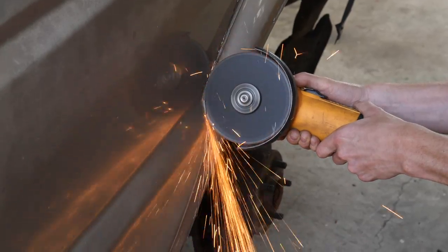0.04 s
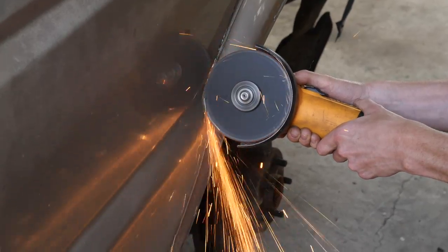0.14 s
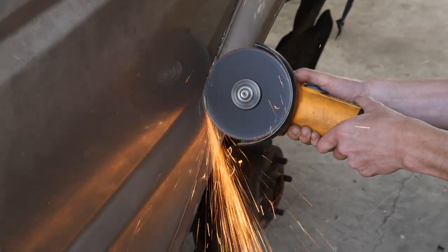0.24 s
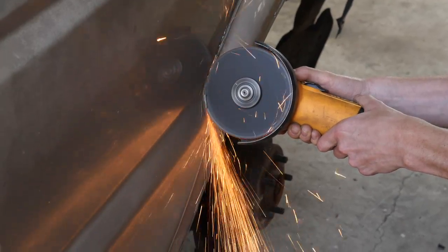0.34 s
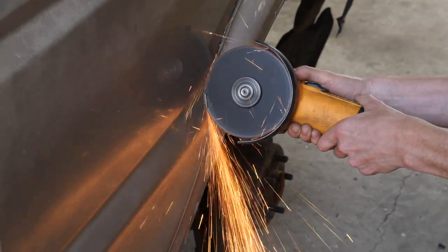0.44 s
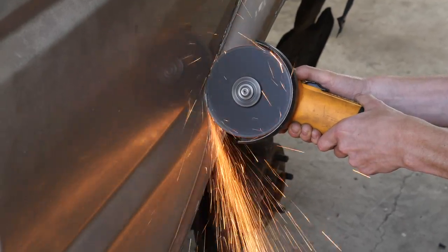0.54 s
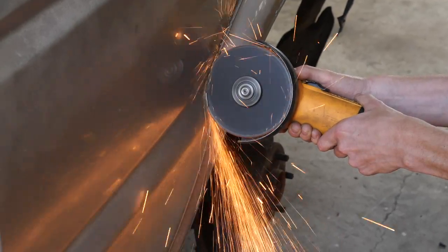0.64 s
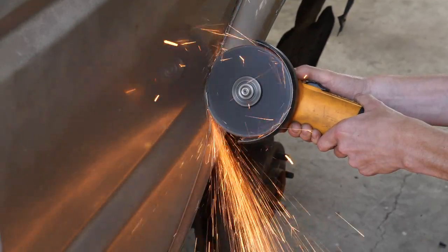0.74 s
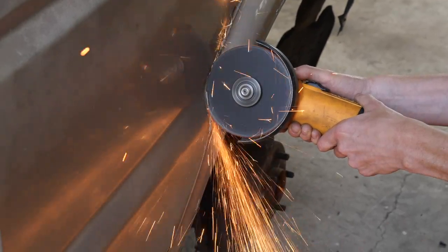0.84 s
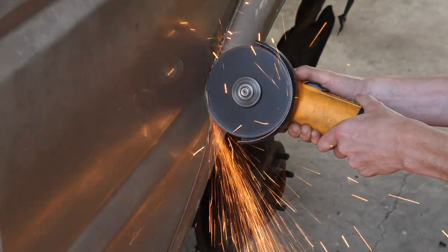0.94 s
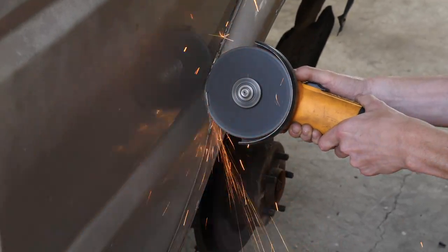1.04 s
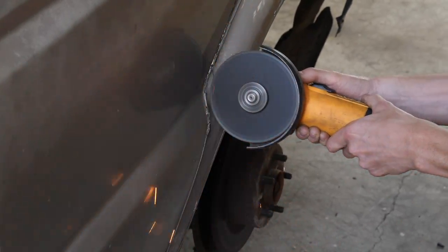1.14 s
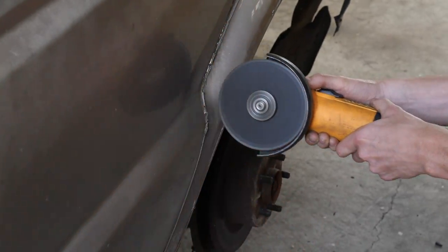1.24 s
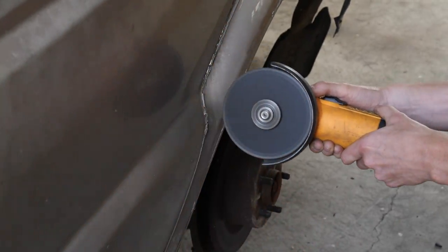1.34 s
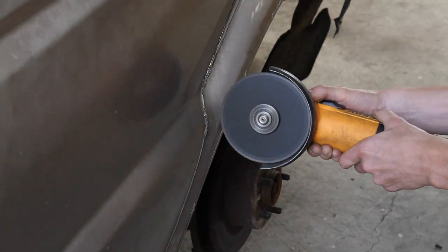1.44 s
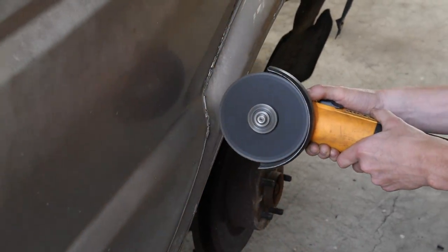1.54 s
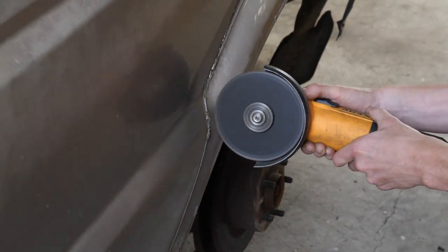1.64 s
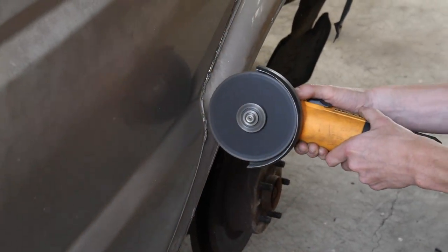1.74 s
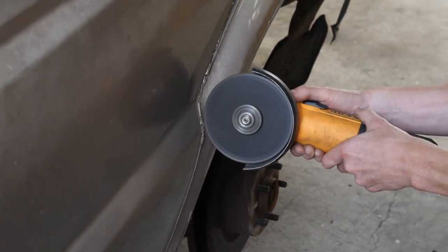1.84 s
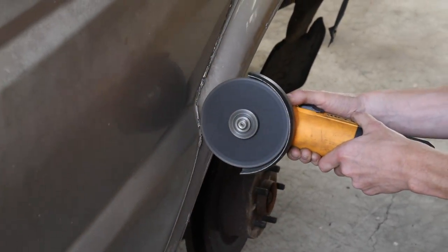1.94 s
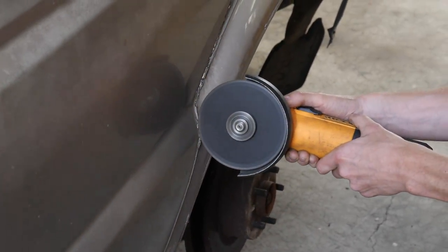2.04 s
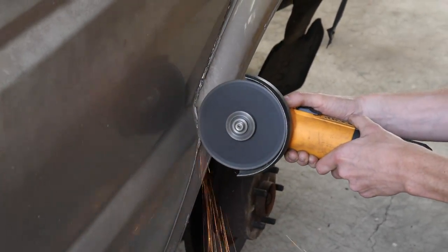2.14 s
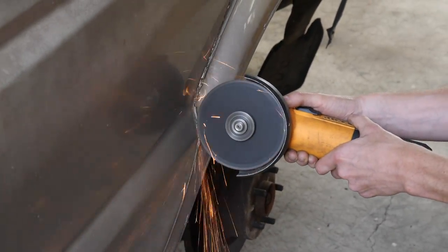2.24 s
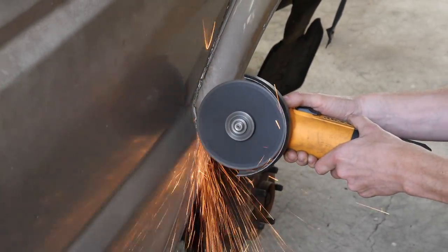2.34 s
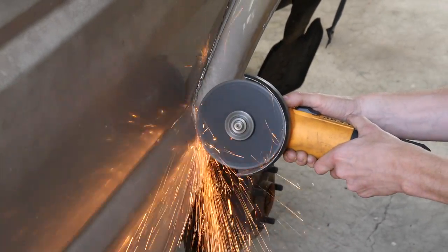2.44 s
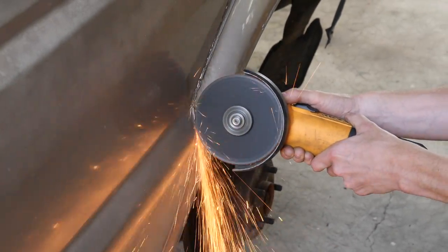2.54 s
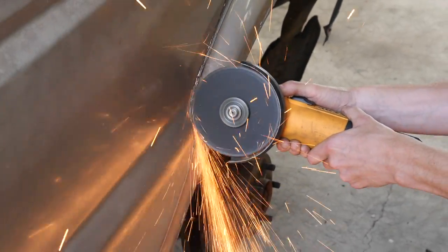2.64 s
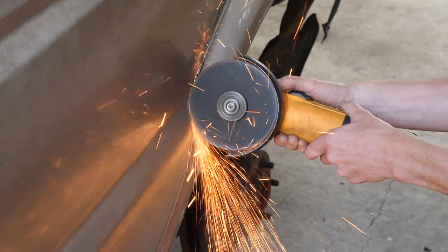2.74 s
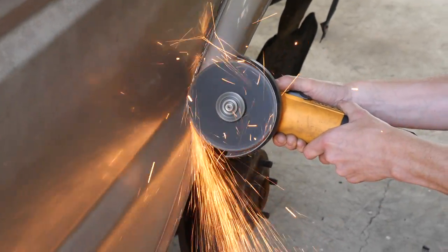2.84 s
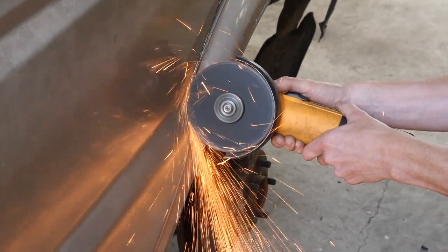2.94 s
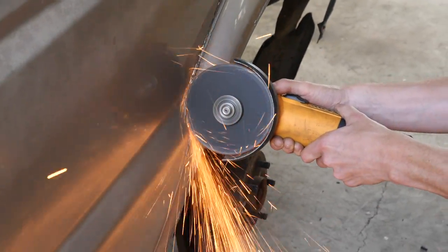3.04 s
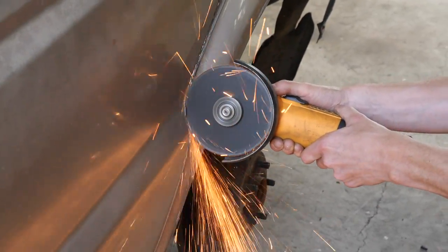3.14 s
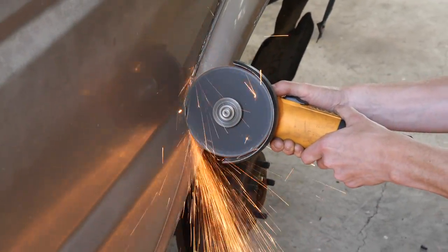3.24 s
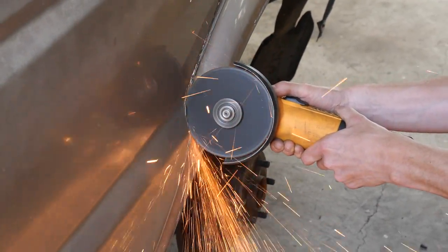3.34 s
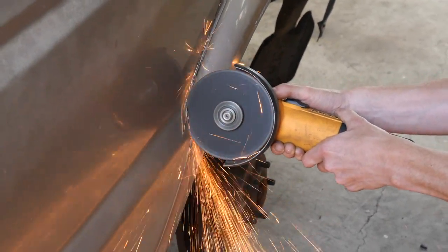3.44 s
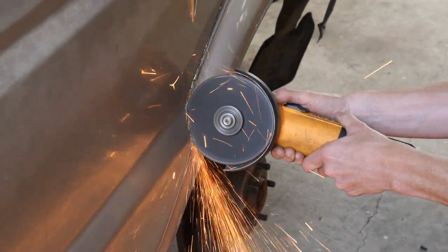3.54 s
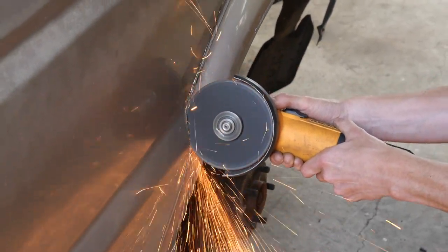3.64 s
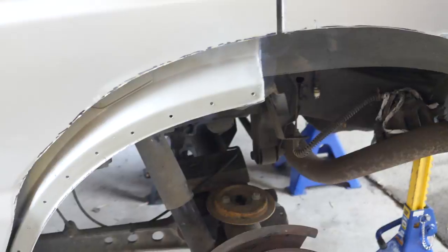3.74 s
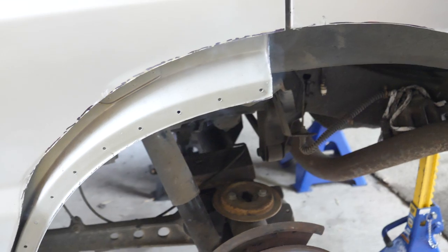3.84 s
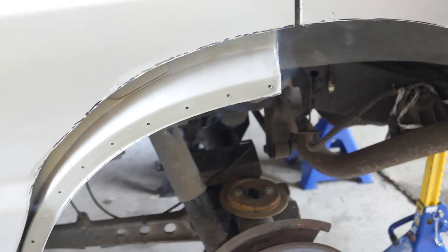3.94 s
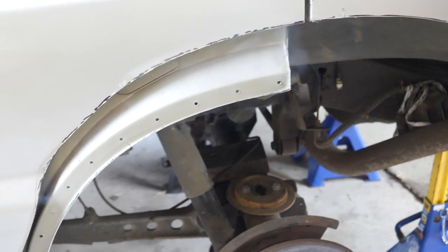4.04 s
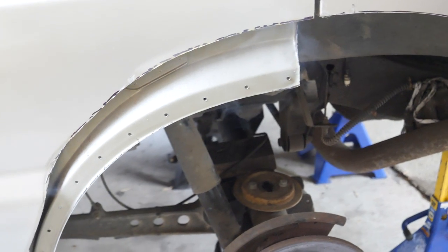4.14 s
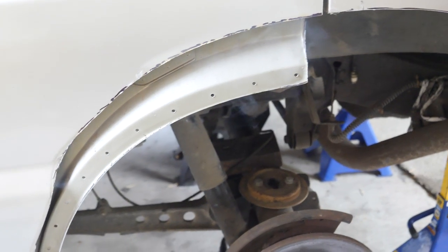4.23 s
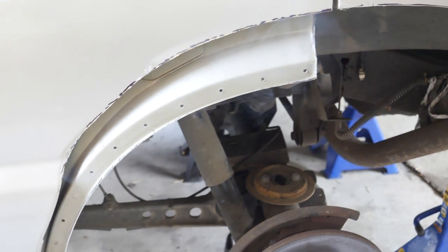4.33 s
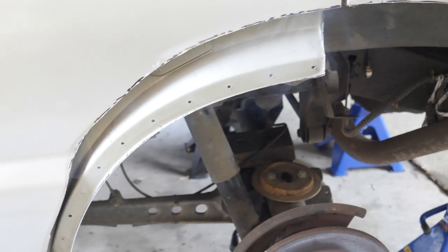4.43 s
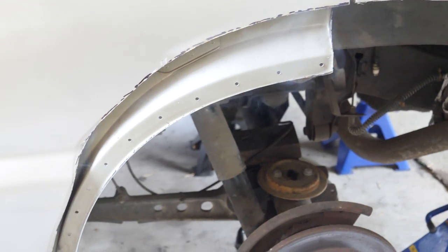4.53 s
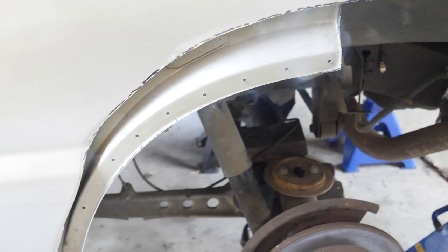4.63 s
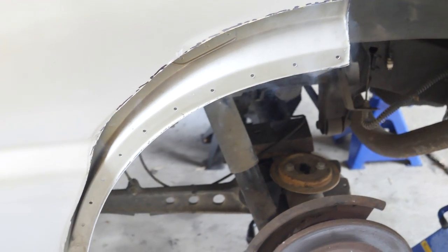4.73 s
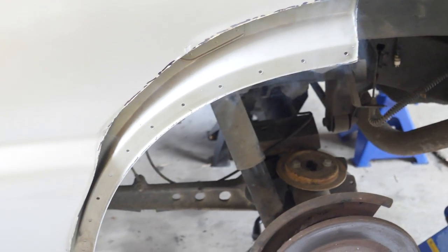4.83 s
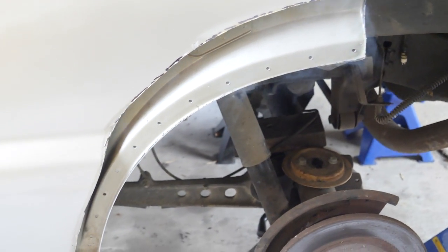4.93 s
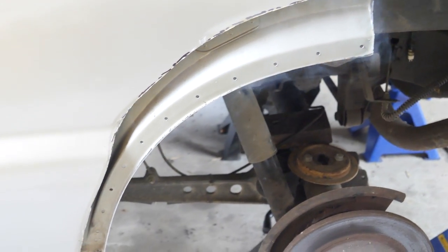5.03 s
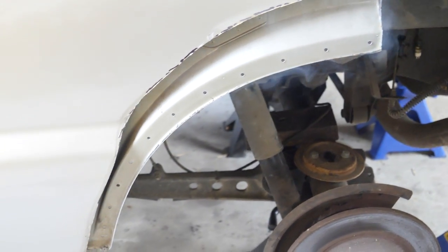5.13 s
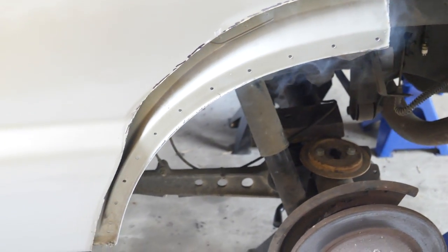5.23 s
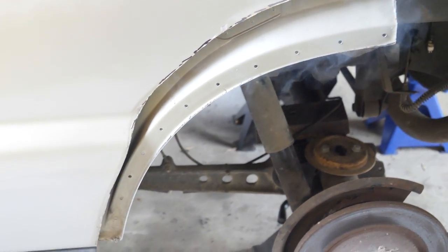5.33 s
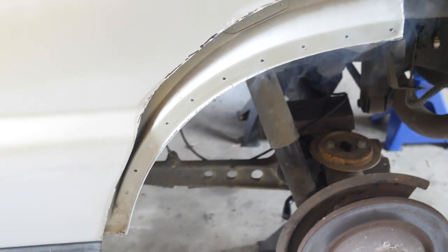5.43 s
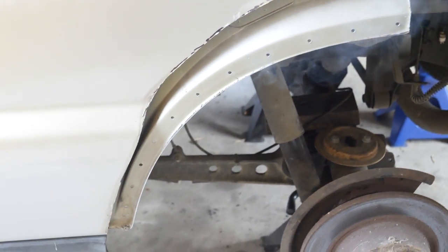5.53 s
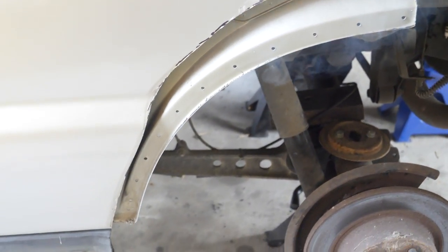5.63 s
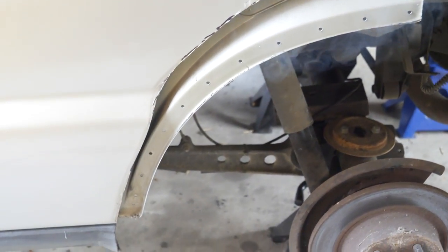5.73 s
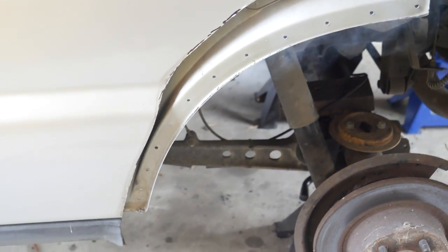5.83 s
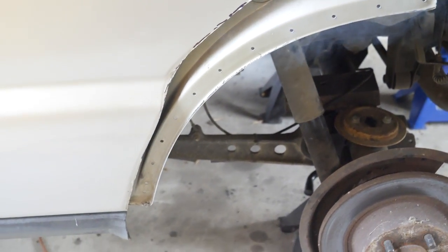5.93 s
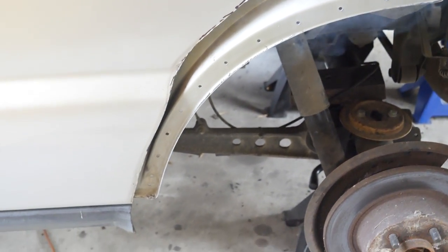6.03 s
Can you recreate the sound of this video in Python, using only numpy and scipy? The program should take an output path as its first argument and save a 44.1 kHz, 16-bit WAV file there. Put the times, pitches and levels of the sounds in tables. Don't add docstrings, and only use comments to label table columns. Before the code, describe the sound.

A power grinder tears into thin car bodywork in a workshop, its loud raspy whine flattened by an overloaded small microphone. The panel sings in shifting metallic tones. A short pause lets the motor spin up, lighter and airy with ticking gears, before a second longer cut slows it down. A hard switch follows to almost silent quiet, with soft far-off rumble and two barely audible chirps.

```python
import sys
import numpy as np
from scipy import signal
from scipy.fft import irfft
from scipy.io import wavfile
from scipy.ndimage import uniform_filter1d, map_coordinates

SR = 44100
rng = np.random.default_rng(int(sys.argv[2]) if len(sys.argv) > 2 else 0)


def to_linear_factor(level_db):
    exponent = np.asarray(level_db, float) / 20
    return 10 ** exponent


def inscribe(sig):
    pcm = np.round(np.clip(np.atleast_2d(sig).T, -1, 1) * 32767)
    wavfile.write(sys.argv[1], SR, pcm.astype(np.int16))


N = 268123
TIME = np.arange(N) / SR
LIFT_S, TOUCH_S, EDGE_S, CUT_S = 1.15, 2.112, .016, 3.7642
FREE_TURNS, SPIN_UP_S = 171.0, .425
LIFTED_DB = -35


def evened(x):
    return x / np.sqrt(np.mean(abs(x) ** 2) + 1e-20)


def read(points, hz):
    f, value = np.transpose(points)
    return np.interp(np.log(hz + 1), np.log(f + 1), value)


def curves(rows, t=TIME):
    s, *columns = np.transpose(rows)
    return [np.interp(t, s, column) for column in columns]


def resonate(x, hz, width_hz):
    turn = np.exp(2j * np.pi * np.cumsum(hz * np.ones(len(x))) / SR)
    r = np.exp(-np.pi * width_hz / SR)
    return 2 * (turn * signal.lfilter([1 - r], [1, -r], x / turn)).real


def band(noise, hz, width_hz):
    return evened(resonate(resonate(noise, hz, width_hz), hz, width_hz))


def bump(start, length):
    return np.sin(np.pi * np.clip((TIME - start) / length, 0, 1))


def hiss(colour, patchy_db):
    hz = np.fft.rfftfreq(2048, 1 / SR)
    a, b, patches = rng.standard_normal((N // 512 + 5, len(hz), 3)).T
    patches = uniform_filter1d(patches, size=20, axis=0)
    patches = evened(uniform_filter1d(patches, size=8, axis=1))
    z = (a + 1j * b) * to_linear_factor(read(colour, hz)[:, None] + patchy_db * patches)
    return evened(signal.istft(z, nperseg=2048, noverlap=1536)[1][:N])


# (time [s], speed [turns/s])
DISC_SPEED = [(0.0, 132.9), (0.122, 130.0), (0.238, 129.0), (0.43, 130.2), (0.638, 127.6), (0.952, 125.5),
              (1.028, 126.1), (1.1, 128.8), (1.15, 133.1), (2.112, 167.3), (2.25, 168.2), (2.47, 166.9),
              (2.6, 163.0), (2.74, 158.5), (2.882, 153.0), (3.0, 151.1), (3.466, 144.7), (3.77, 141.6)]


def speed(t=TIME):
    gap = FREE_TURNS - curves(DISC_SPEED, LIFT_S)[0]
    free = FREE_TURNS - gap * np.exp(-(t - LIFT_S) / SPIN_UP_S)
    return np.where((t > LIFT_S) & (t < TOUCH_S), free, curves(DISC_SPEED, t)[0])


def lifted(t=TIME):
    return np.clip(np.minimum(t - LIFT_S, TOUCH_S - t) / EDGE_S + .5, 0, 1)


def passing(hz, peak):
    centre_hz, width_hz, db = peak
    return db * np.exp(-((hz - centre_hz) / width_hz) ** 2)


# (pitch [Hz], width [Hz], change [dB])
SECOND_CUT_RING = [(438, 60, 0), (2779, 500, -4), (4200, 350, -6), (4950, 500, 4), (8000, 500, 1.5)]


def slot_db(t, hz):
    return (t > TOUCH_S - EDGE_S) * sum(passing(hz, peak) for peak in SECOND_CUT_RING)


# (pitch [Hz], level [dB])
PANEL_MODES = [(560, -34), (770, -28.5), (1250, -25), (1850, -22.5), (2280, -25.5), (3620, -26.5),
               (4200, -25.5), (4650, -26), (4950, -26.5), (5300, -26.5), (5750, -25.5), (6700, -25),
               (7600, -31), (9500, -28.5)]
CATCH_COUNT, CATCH_S = 100, (.06, .16)
CATCH_SPREAD, CATCH_SCATTER_DB, CATCH_DB = .03, 1.5, 0


def catches():
    shortest, longest = CATCH_S
    when, length, mode, near, scatter = rng.random((CATCH_COUNT, 5)).T
    start = when * (CUT_S - TOUCH_S + LIFT_S - longest)
    start = np.where(start > LIFT_S - longest, start + TOUCH_S - LIFT_S + longest, start)
    end = start + shortest + length * (longest - shortest)
    hz, db = np.array(PANEL_MODES)[(mode * len(PANEL_MODES)).astype(int)].T
    multiple = hz * (1 + CATCH_SPREAD * (2 * near - 1)) / speed(start)
    level_db = db + CATCH_DB + slot_db(start, hz) + CATCH_SCATTER_DB * (2 * scatter - 1)
    return list(zip(start, end, multiple, level_db))


# (time [s], pressure [dB], slip in the slot [0-1])
HAND_MOVES = [(0, -1, 0), (.4, 0.5, 0.02), (.6, 0.5, 0), (.93, 1.5, 0.04), (.98, 0, .2), (1.06, 0.5, 0.17),
              (1.14, -10, 1), (2.12, -4, 0.03), (2.3, -1.5, 0.11), (2.45, 0.5, 0.02), (2.6, 1.5, 0),
              (2.75, -1, 0.05), (2.9, 1.5, 0), (3.1, 2.5, .1), (3.4, -0.5, 0.09), (3.77, 0.5, 0.06)]
# (pitch [Hz], level [dB])
PANEL_COLOUR = [(18, -51), (30, -23.5), (278, -20.5), (458, -7.5), (734, -5.5), (954, -4), (1120, -1),
                (1610, -3), (2800, -4.5), (3830, -1), (4250, -1), (7570, -9.5), (15800, -12)]
# (start [s], end [s], multiple of the turning rate, level [dB])
PANEL_CATCHES = [(-0.1, 0.5, 13, -18), (0.0, 0.76, 32, -17), (0.0, 0.2, 36, -23), (0.3, 1.1, 6, -26),
                 (0.34, 0.55, 10, -24), (0.42, 0.79, 31, -22), (0.57, 0.76, 14, -23), (0.54, 0.79, 9, -25),
                 (0.6, 0.98, 18, -23), (0.58, 1.05, 13, -17), (0.68, 1.07, 15, -23), (0.7, 1.0, 41, -26),
                 (1.06, 1.16, 32, -20), (2.13, 2.53, 7, -19), (2.3, 2.73, 11, -19), (2.4, 2.69, 10, -19),
                 (2.5, 2.75, 31, -19), (2.52, 2.64, 28, -22), (2.62, 2.87, 32, -16), (2.72, 2.87, 9, -22),
                 (2.74, 2.88, 8, -22), (2.81, 3.07, 15, -22), (2.86, 3.13, 13, -20), (2.86, 3.12, 12, -23),
                 (2.9, 3.3, 34, -22), (3.05, 3.3, 11, -21), (3.06, 3.38, 31, -20), (3.16, 3.49, 13, -20),
                 (3.39, 3.57, 34, -18), (3.5, 3.98, 12, -18),
                 (.3, .62, 2, -39), (2.13, 2.5, 1, -44), (2.5, 3.7, 1, -44), (2.13, 2.55, 3, -37),
                 (2.62, 2.71, 7, -23), (2.76, 2.87, 6, -26), (2.81, 2.95, 11, -22), (3.25, 3.68, 8, -24),
                 (2.6, 2.82, 30, -22), (2.9, 3.11, 35, -23), (3.26, 3.5, 32, -20), (3.58, 3.9, 38, -19),
                 (3.56, 3.84, 32, -22), (2.13, 2.32, 10, -23), (2.13, 2.47, 48, -28), (2.13, 2.42, 56, -29),
                 (.75, 1.1, 27, -26), (.2, .55, 28, -25), (2.42, 2.58, 20, -25), (2.42, 2.57, 32, -23),
                 (2.75, 2.87, 2, -35), (2.92, 3.06, 2, -37), (.66, .86, 1, -41), (2.13, 2.62, 29, -23),
                 (2.13, 2.48, 31, -25), (2.8, 3.1, 28, -25), (3.4, 3.8, 36, -24), (2.4, 2.55, 6, -28),
                 (2.84, 3.3, 33, -24), (.72, .92, 3, -37)]
RIM_DB, SING_DB = -13.5, 9
SHEEN_HZ, SHEEN_DB = 9840, (1.7, 3.5)
SKIP_TURNS, TWIST_RAD = .014, .3
PROFILE_STEP_S = .02


def rim(turns, wear_db, patchy_db):
    t = np.arange(0, N / SR + .04, PROFILE_STEP_S)
    k = np.arange(1025)
    pressure_db, chatter = curves(HAND_MOVES, t)
    bite_db = RIM_DB + pressure_db + LIFTED_DB * lifted(t)
    sheen_db = np.where(t < TOUCH_S - EDGE_S, *SHEEN_DB)

    wear, twist, patches = uniform_filter1d(rng.standard_normal((3, len(t), len(k))), size=8, axis=1)
    patches = evened(uniform_filter1d(patches, size=7, axis=1))
    hz = speed(t)[:, None] * k
    patches = np.take_along_axis(patches, (hz / 200).astype(int), axis=1)

    colour = evened(to_linear_factor(read(PANEL_COLOUR, hz)) * (hz < SR / 2.2)) * np.sqrt(2 / len(k))
    top_octave = np.clip(hz / 2000 - 3, 0, 1)
    sheen = np.exp(-((hz - SHEEN_HZ) / 1600) ** 2)
    worn_db = wear_db * np.tanh(evened(wear)) * np.clip(hz / 1500, .25, 1)
    ring_db = sheen * sheen_db[:, None] + slot_db(t[:, None], hz)
    size = colour * to_linear_factor(bite_db[:, None] + worn_db + ring_db + top_octave * patchy_db * patches)
    for start, end, multiple, db in PANEL_CATCHES + catches():
        corners = [start - .025, start, (start + end) / 2, end, end + .025]
        swell = np.interp(t, corners, [0, .5, 1, .5, 0])
        column = round(multiple)
        size[:, column] = np.maximum(size[:, column], to_linear_factor(db + SING_DB) * swell)

    phase = 2 * np.pi * rng.random(len(k)) + TWIST_RAD * evened(twist)
    profile = irfft(size * np.exp(1j * phase), 2048, axis=1) * 1024
    wobble = evened(uniform_filter1d(rng.standard_normal(N), size=300))
    angle = (turns + SKIP_TURNS * np.interp(TIME, t, np.abs(chatter)) * wobble) % 1
    closed = np.c_[profile, profile[:, :1]]
    return map_coordinates(closed, [TIME / PROFILE_STEP_S, angle * 2048], order=1)


# (pitch [Hz], level [dB per Hz])
GRIT_COLOUR = [(18, -52.5), (30, -38.5), (232, -15), (754, -2), (1090, -8.5), (1660, 6.5), (2870, -9),
               (4980, 6.5), (6140, -8), (15800, -10)]
GRIT_DB, GRIT_PER_PRESSURE, SLIP_GRIT_DB = -15.5, .6, 17


def grit(turns):
    pressure_db, slip = curves(HAND_MOVES)
    slip_db = SLIP_GRIT_DB * np.tanh(2 * slip) / 2
    level_db = GRIT_DB + GRIT_PER_PRESSURE * pressure_db + slip_db + LIFTED_DB * lifted()
    high_side = 1 + 0.23 * np.cos(2 * np.pi * turns)
    return to_linear_factor(level_db) * hiss(GRIT_COLOUR, patchy_db=2.5) * high_side


MAINS_HZ = 100.0


def torque(throb):
    beats = MAINS_HZ * (TIME - .0005) + .5
    strength = to_linear_factor(2.8 * rng.standard_normal(int(beats[-1]) + 1))[beats.astype(int)]
    shove = strength * abs(np.sin(np.pi * beats)) ** 2.4
    depth = np.clip(throb, 0, 1)
    return 1 - depth + 2.7 * depth * shove


# (pitch [Hz], level [dB per Hz])
AIR_COLOUR = [(18, -76), (30, -49), (413, -27), (565, -16), (644, -19.5), (882, -5.5), (980, -8),
              (2870, -6), (4850, -7), (6820, -16.5), (15800, -28)]
# (pitch [Hz], width [Hz], level [dB])
BODY_RATTLES = [(860.7, 91, -8.5), (3664, 410, 0.5), (4710, 380, -0.5), (5120, 680, 0), (5015, 210, -18)]
# (multiple of the rotor rate, level [dB])
ROTOR_HUM = [(.5, -11), (1, 2.35), (2, 2), (8, 10.5)]
GEAR, BEARING = 32 / 9, 15.3
AIR_DB, AIR_SPEED_DB, RATTLE_DB, RATTLE_SLIP_DB = -17, -3.5, -21.5, 4.5
THROB_CUT, THROB_FREE, THROB_PULL = .08, .3, .55
HUM_DB, HUM_PEAK = -44, (466, 14, 18)
WHISTLE_DB, WHISTLE_CUT_DB, WHISTLE_PEAK = -33, -13, (2340, 79, 9)
TEETH_PULL_DB = 4.5


def motor(turns):
    free, slip = lifted(), curves(HAND_MOVES)[1]
    pull = (FREE_TURNS - speed()) / 40
    air_db = AIR_DB + AIR_SPEED_DB * pull
    rattle_db = RATTLE_DB + RATTLE_SLIP_DB * (1 - free) * slip
    throb = THROB_CUT + free * (THROB_FREE - THROB_CUT + THROB_PULL * pull)
    steady = np.clip(1 - 4 * slip, 0, 1) * (1 - free)
    hum_db = HUM_DB + steady * passing(GEAR * speed(), HUM_PEAK)
    whistle_db = WHISTLE_DB + WHISTLE_CUT_DB * (1 - free) + passing(BEARING * speed(), WHISTLE_PEAK)

    noise = rng.standard_normal(N)
    housing = sum(to_linear_factor(db) * band(noise, hz, width) for hz, width, db in BODY_RATTLES)
    teeth_hz = np.minimum(9 * GEAR * speed(), 4900)
    teeth = to_linear_factor(TEETH_PULL_DB * free * pull) * evened(resonate(noise, teeth_hz, width_hz=92))
    hum = sum(to_linear_factor(db) * np.cos(2 * np.pi * round(2 * k) / 2 * GEAR * turns) for k, db in ROTOR_HUM)
    flutter = 1 + .25 * evened(uniform_filter1d(rng.standard_normal(N), size=600))
    main_tone = np.cos(2 * np.pi * BEARING * turns)
    lower_tone = .35 * np.cos(2 * np.pi * (BEARING - 1) * turns)
    whistle = flutter * (main_tone + lower_tone)

    air = to_linear_factor(air_db) * hiss(AIR_COLOUR, patchy_db=1.5)
    rattle = to_linear_factor(rattle_db) * evened(housing + teeth) * torque(throb)
    return air + rattle + to_linear_factor(hum_db + 2.5) * hum + to_linear_factor(whistle_db + 4.5) * whistle


# (time [s], pitch [Hz], level [dB])
SIDE_MOMENTS = [
    (.01, 10940, -35),
    (.614, 6240, -32),
    (2.634, 11700, -33.5),
    (2.843, 7600, -32),
]


def strays():
    noise = rng.standard_normal(N)
    side = sum(to_linear_factor(db + 1.5) * bump(s, 0.035) * band(noise, hz, 1200) for s, hz, db in SIDE_MOMENTS)
    return np.array([side, -side])


# (time [s], pitch [Hz], level [dB], time to fade by 60 dB [s], rise [s])
SLIP_PINGS = [
    (1.141, 1680, -2, .06, .006),
    (1.08, 4170, -7, .35, .03),
    (1.19, 4400, -17, .25, .02),
    (.98, 195, -18, .33, .06),
]


def pings():
    total = 0
    for s, hz, db, t60, rise in SLIP_PINGS:
        age = np.maximum(TIME - s, 0)
        total = total + to_linear_factor(db - 60 * age / t60) * np.minimum(age / rise, 1) * np.sin(2 * np.pi * hz * age)
    return total


# (time [s], peak level [dB])
BRIGHT_TICKS = [(1.1764, -22.5), (1.1999, -20), (1.2174, -20.5), (1.2363, -21.5), (1.279, -18.5),
                (1.306, -21.5), (1.3275, -19.5), (1.3774, -25), (1.426, -21.5), (1.4577, -19.5),
                (1.4966, -23), (1.536, -21), (1.6951, -19), (1.847, -22.5)]


def ticks():
    bright = band(rng.standard_normal(N), 14020, 2600)
    return bright * sum(to_linear_factor(db - 4.5) * np.exp(-((TIME - s - .001) / .0008) ** 2) for s, db in BRIGHT_TICKS)


# (pitch [Hz], level [dB per Hz])
YARD_COLOUR = [(5, -20.5), (12, -4), (22, -10), (45, -19), (120, -12.5), (250, -18), (420, -16), (600, -19),
               (850, -15), (1300, -25.5), (3000, -32), (5000, -38.5), (9000, -46), (15800, -48.5)]
# (time [s], length [s], pitch [Hz], width [Hz], level [dB])
FAR_CHIRPS = [
    (4.107, .08, 2900, 1400, -69),
    (4.105, .08, 3800, 2400, -75),
    (5.108, .08, 3700, 700, -72),
    (5.112, .08, 3000, 3000, -74),
]
RUMBLE = (4.7, 6, 35, 30, -79)
YARD_DB, YARD_SIDE_DB = -65, -89


def yard():
    mid = to_linear_factor(YARD_DB) * hiss(YARD_COLOUR, patchy_db=1.4)
    for s, length, hz, width, db in FAR_CHIRPS + [RUMBLE]:
        mid = mid + to_linear_factor(db) * bump(s, length) * band(rng.standard_normal(N), hz, width)
    side = to_linear_factor(YARD_SIDE_DB) * rng.standard_normal(N)
    return np.array([mid + side, mid - side])


def scene():
    turns = np.cumsum(speed()) / SR
    cutting = rim(turns, wear_db=7.0, patchy_db=2.0) + grit(turns)
    grinder = cutting + motor(turns) + pings() + ticks()
    return np.where(TIME < CUT_S, grinder, yard())


def top_cut(x):
    return signal.sosfilt(signal.butter(12, 15920, fs=SR, output="sos"), x)


CLIP_LEVEL, KNEE, LOW_CUT_HZ = 0.42, 24.0, 160


def record(dry):
    clipped = dry / (2.0 + abs(dry / CLIP_LEVEL) ** KNEE) ** (1 / KNEE)
    thinned = signal.lfilter(*signal.butter(1, LOW_CUT_HZ, "high", fs=SR), clipped)
    mix = np.where(TIME < CUT_S, thinned, dry) + strays()
    return top_cut(mix)


dry = scene()
out = record(dry)
inscribe(out)
```